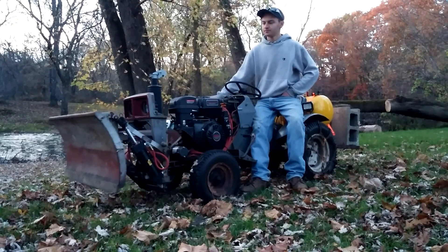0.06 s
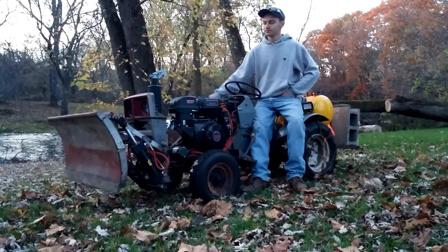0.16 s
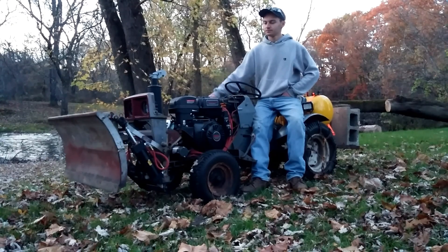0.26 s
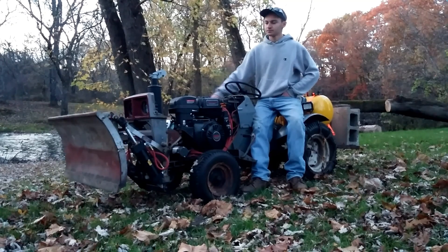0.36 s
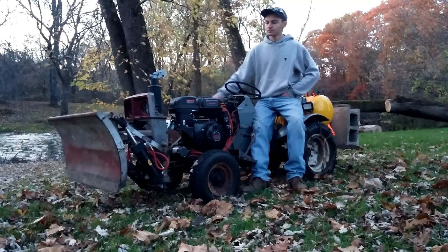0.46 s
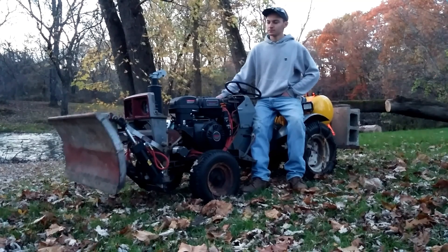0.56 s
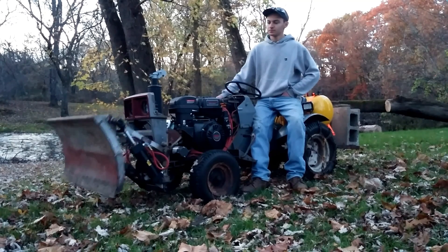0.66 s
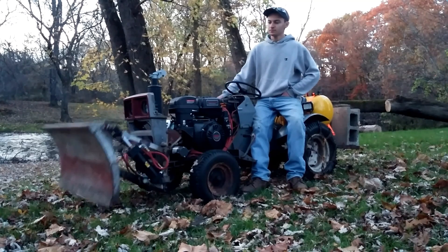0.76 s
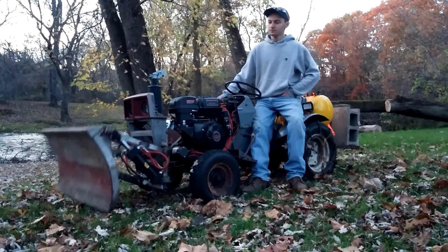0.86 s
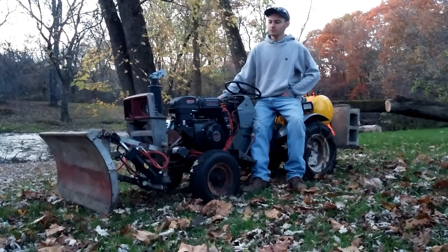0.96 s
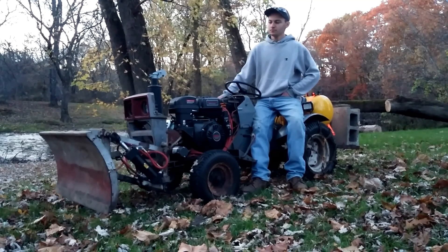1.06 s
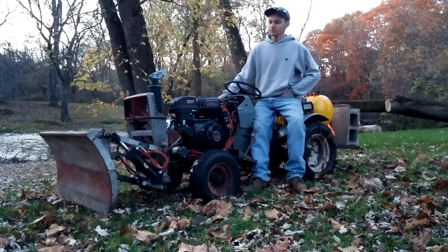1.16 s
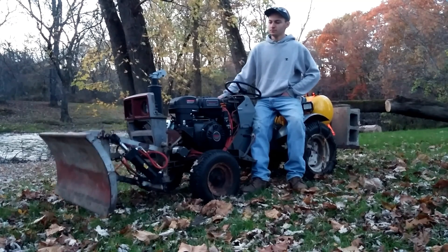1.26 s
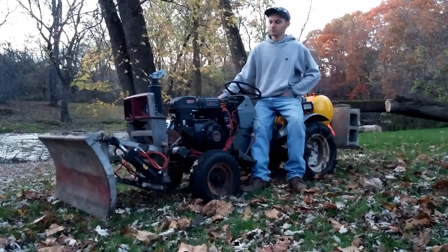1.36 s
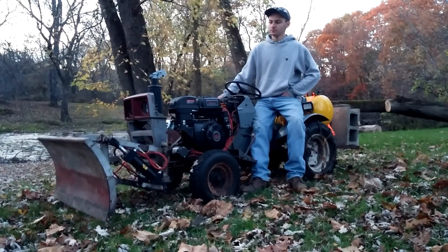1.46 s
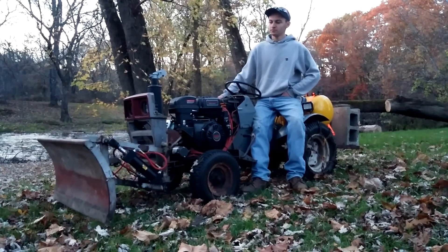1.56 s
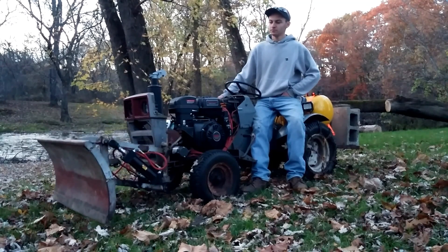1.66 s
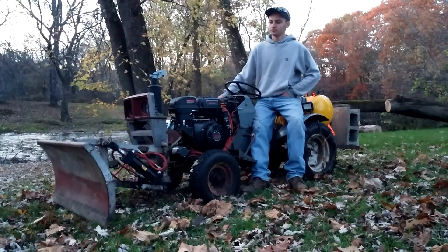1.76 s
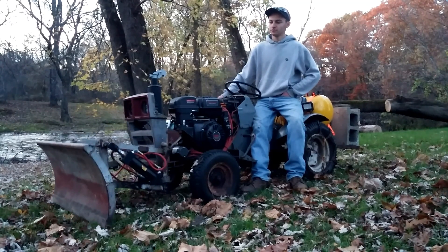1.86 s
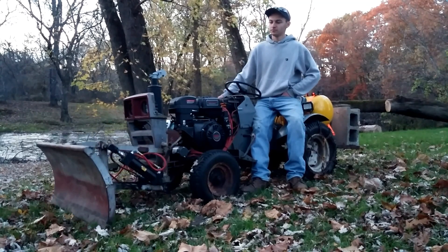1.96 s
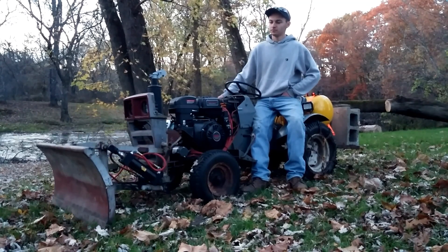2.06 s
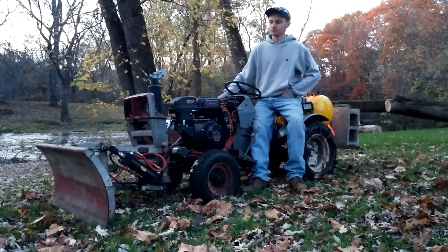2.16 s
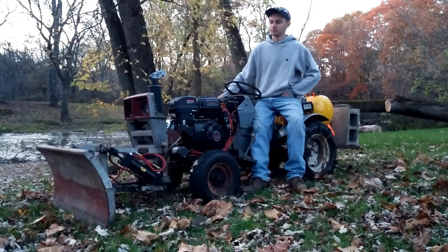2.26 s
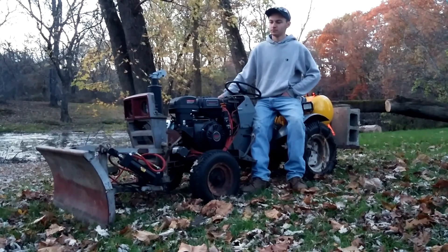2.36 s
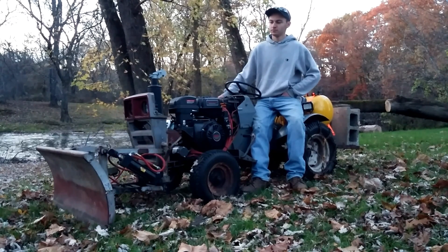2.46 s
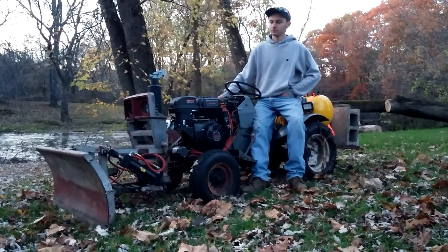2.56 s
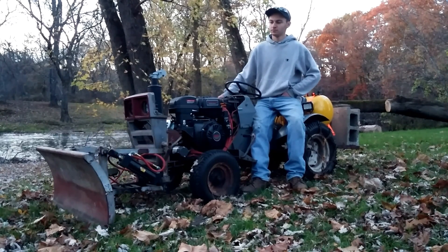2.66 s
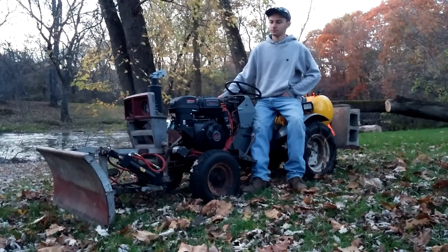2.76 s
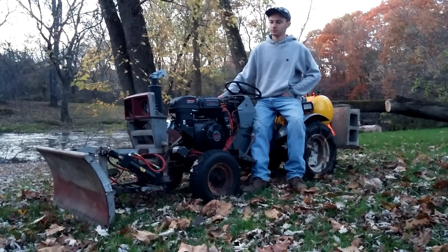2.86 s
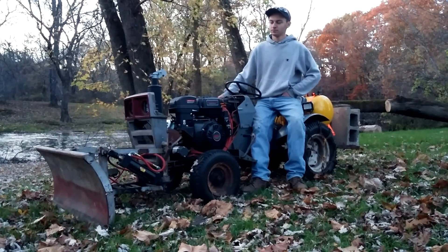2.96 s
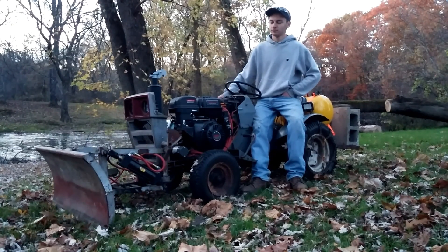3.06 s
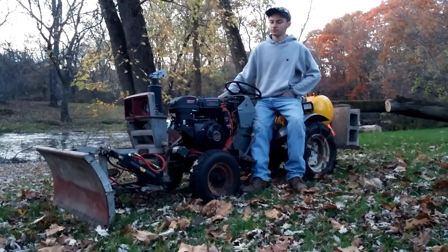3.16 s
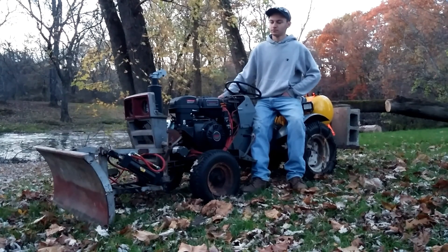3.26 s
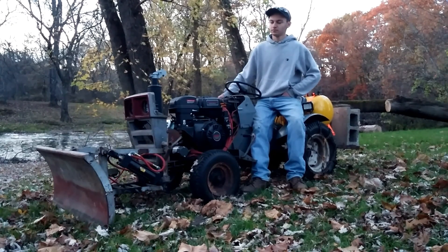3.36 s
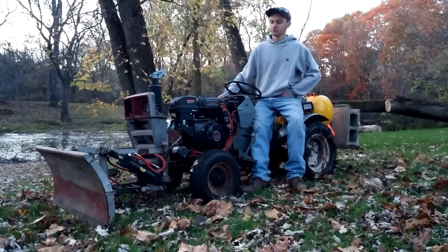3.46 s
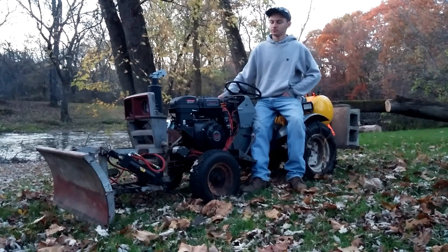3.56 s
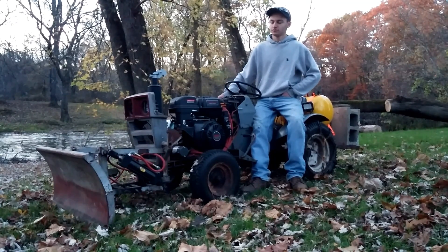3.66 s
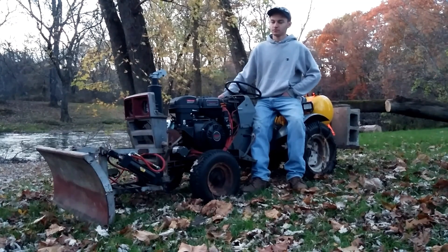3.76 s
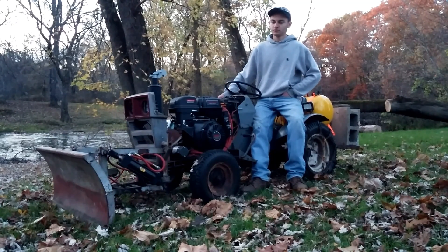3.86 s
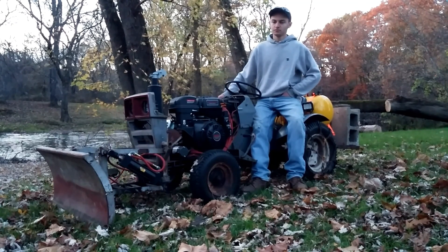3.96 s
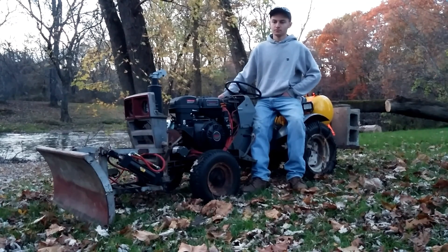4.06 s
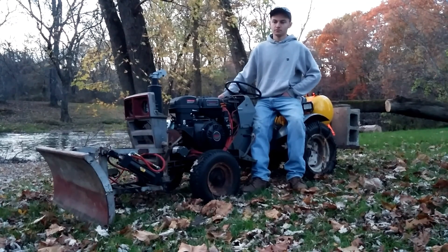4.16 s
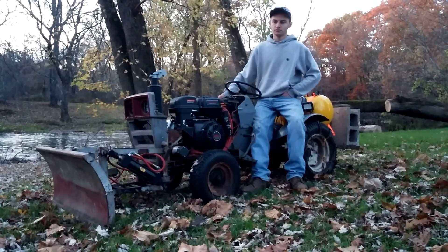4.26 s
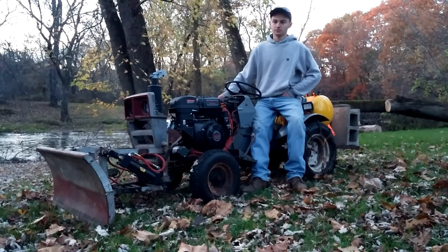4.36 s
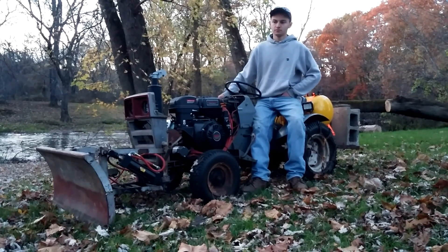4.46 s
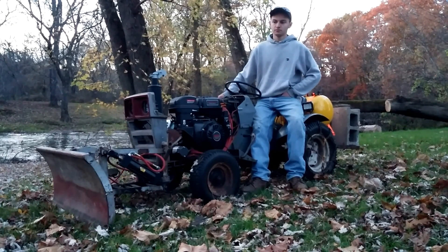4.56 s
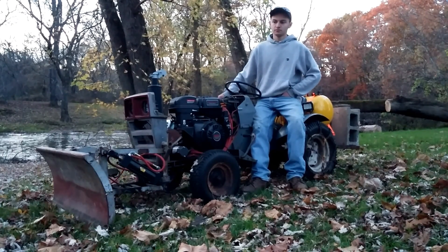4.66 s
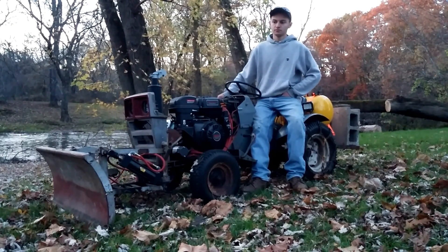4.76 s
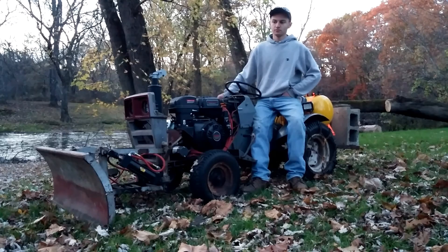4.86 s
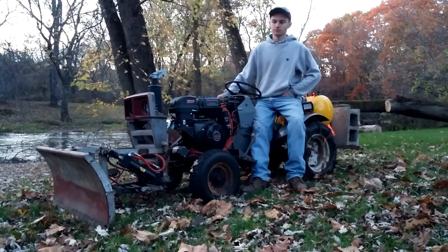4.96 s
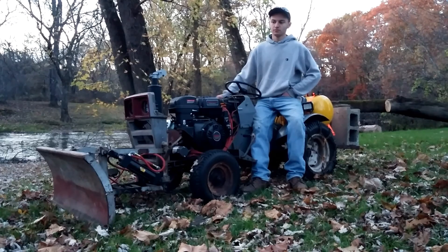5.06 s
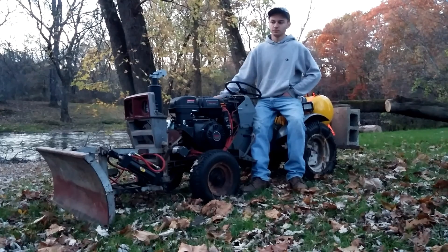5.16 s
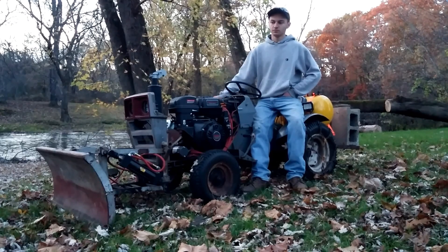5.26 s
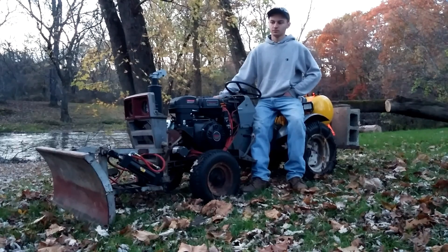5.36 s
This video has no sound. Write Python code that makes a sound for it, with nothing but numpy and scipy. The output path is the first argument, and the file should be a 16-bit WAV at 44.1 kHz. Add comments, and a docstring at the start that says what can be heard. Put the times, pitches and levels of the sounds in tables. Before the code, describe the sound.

Outdoors at a wood's edge, heard fairly close and centred. A bright, strong air hiss is already running and cuts off around 0.14 s, as a lift arm clangs hard at 0.17 s, with smaller clacks and another sharp clank near 0.35 s. At about 0.7 s a second port opens with a thin, whistly high hiss and some roar; duller linkage knocks follow at 0.83 and 0.9 s. The steel blade lands with a ringing clank at 1.7 s, hits again near 2.04 s, then bounces in quick, weakening, duller knocks until about 2.6 s. The hiss holds until 2.9 s, then loses its roar and fades away by around 5 s. Faint distant traffic and dry leaf rustle slowly grow, with soft low bumps near 3.0, 3.9 and 4.9-5.1 s. At 5.35 s a louder, bright air blast begins abruptly. Soft echoes return from the trees.

```python
"""Air-driven blade of a parked garden tractor

At the edge of a wood, one valve port hisses until the lift arm clanks against its stop. The other then vents
the cylinder while the steel blade drops, lands and bounces, and fades as the pressure runs out; the first port
opens again. Jets are coloured noise, knocks are decaying modes and noise bands, trees are sparse-free noise echoes.
Far traffic and dry leaves, made of wavering noise, grow behind them, with a few soft low bumps.
"""
import sys
import numpy as np
from scipy import signal
from scipy.fft import rfft, irfft, next_fast_len
from scipy.io import wavfile
from scipy.ndimage import uniform_filter1d

SR = 44100
rng = np.random.default_rng(int(sys.argv[2]) if len(sys.argv) > 2 else 0)


def waveform_to_disk(signal):
    """Save audio, clipped to [-1, 1], as 16-bit WAV at the path in sys.argv[1]."""
    frames = np.transpose(np.atleast_2d(signal))
    scaled = np.clip(frames, -1, 1) * 32767
    samples = np.round(scaled).astype(np.int16)
    wavfile.write(sys.argv[1], SR, samples)


N = 238845
TIME = np.arange(N) / SR  # s
AGE = TIME[:SR * 2 // 5]  # time since a knock, s

# modes of the tractor frame, shaken by arm and blade alike: (frequency [Hz], relative level [dB])
FRAME_MODES = [(110, -20), (195, -17), (232, -5), (262, -8), (323, -2), (355, -7), (393, 2), (415, -3),
               (478, -13), (570, -20)]
FRAME_T60 = 0.17  # ring time of the frame, scaled to 1 kHz, s
SCATTER_DB = 1.2  # random spread of mode levels from blow to blow


def from_db(db):
    """Decibels to gain."""
    return 10 ** (np.asarray(db) / 20)


def rms_one(x):
    """Scale to unit power."""
    return x / np.sqrt(np.mean(x ** 2) + 1e-20)


def at_hz(rows, hz, axis=1):
    """One column of a spectrum, read on a log-frequency axis."""
    rows = np.array(rows)
    return np.interp(np.log(hz + 1), np.log(rows[:, 0]), rows[:, axis])


def noise(gain_at, size=N):
    """Unit-power noise whose colour is a function of frequency."""
    padded = next_fast_len(size, True)
    hz = np.arange(padded // 2 + 1) * SR / padded
    spectrum = rfft(rng.standard_normal(padded)) * gain_at(hz)
    return rms_one(irfft(spectrum, padded)[:size])


def coloured(spectrum, resonances=()):
    """Unit-power noise with a broad spectrum and narrow resonances standing on it."""
    def gain_at(hz):
        power = from_db(at_hz(spectrum, hz)) ** 2
        for centre, width, db in resonances:
            power = power + from_db(db) ** 2 / (1 + (2 * (hz - centre) / width) ** 2) ** 2
        return np.sqrt(power)
    return noise(gain_at)


def flutter(rate_hz, depth_db):
    """A gain that wanders at random, mostly slower than the given rate; the depth is RMS."""
    return from_db(depth_db * noise(lambda hz: 1 / (1 + (hz / rate_hz) ** 4)))


def low_pass(x, hz, order=2):
    """Causal Butterworth low-pass."""
    return signal.sosfilt(signal.butter(order, min(hz, SR / 2 - 100), fs=SR, output="sos"), x)


def ring(modes, t60_at_khz):
    """Struck modes of unit starting power; high ones die sooner, and each blow shares its energy anew."""
    hz, db = np.array(modes).T[:, :, None]
    t60 = t60_at_khz * (hz / 1000) ** -.4
    gain = from_db(db + SCATTER_DB * rng.standard_normal(db.shape))
    phase = 2 * np.pi * (hz * AGE + rng.random(hz.shape))
    waves = np.sin(phase) * from_db(-60 * AGE / t60)
    return np.sum(gain * waves, axis=0) / np.sqrt(np.sum(gain ** 2) / 2)


def crowd(table, count=18):
    """Modes too dense to tell apart: noise bands, each dying at its own rate; unit starting power."""
    edges = np.geomspace(150, 16000, count + 1)  # Hz
    centres = np.sqrt(edges[1:] * edges[:-1])
    gains = from_db(at_hz(table, centres)) * np.sqrt(np.diff(edges))
    t60s = at_hz(table, centres, axis=2)
    out = 0
    for low, high, gain, t60 in zip(edges, edges[1:], gains, t60s):
        band = noise(lambda hz: (hz >= low) & (hz < high), size=len(AGE))
        out = out + gain * band * from_db(-60 * AGE / t60)
    return out / np.sqrt(np.sum(gains ** 2))


def ping(centre_hz, width_hz, t60):
    """A short cluster of close modes around one pitch; about unit starting power."""
    cluster = noise(lambda hz: 1 / (1 + (2 * (hz - centre_hz) / width_hz) ** 2), size=len(AGE))
    envelope = np.sqrt(uniform_filter1d(cluster ** 2, size=SR // 50) + 1e-12)
    return cluster / envelope * from_db(-60 * AGE / t60)


def build_up(seconds):
    """Onset gain: vibration takes a moment to spread through the loose steel."""
    return 1 - np.exp(-AGE / seconds)


def add(track, s, sound):
    """Lay a sound into a track at a given time."""
    start = round(s * SR)
    track[start:start + len(sound)] += sound[:N - start]


def swell():
    """Nearness of a distant vehicle, 0 to 1; it draws near until the end."""
    peak_s, width_s = 5.62, 1.47
    return 1 / (1 + ((TIME - peak_s) / width_s) ** 4)


def traffic():
    """Lumpy rumble and tyre wash of a far road; moving air makes the wash waver band by band."""
    # spectrum of the rumble: (frequency [Hz], relative density [dB per Hz])
    rumble_spectrum = [(20, -40), (38, -63), (58, 1.5), (85, 5.5), (125, 4), (170, -9), (300, -47)]
    # spectrum of the wash; soft ground cancels the band near 700 Hz: (frequency [Hz], relative density [dB per Hz])
    tyre_spectrum = [(100, -2.5), (170, 0), (220, 3.5), (300, 4), (400, 4), (510, 1), (600, -13),
                     (720, -15), (810, -9), (900, -0.5), (1300, -8), (2000, -11), (2800, -10),
                     (3500, -20.5), (6000, -28), (11000, -40.5), (16000, -53)]
    rumble_db, tyres_db = -53, -47  # level with the vehicle far off
    rumble_swell_db, tyres_swell_db = 5, 5  # how far its approach lifts them

    rumble = coloured(rumble_spectrum) * flutter(rate_hz=16, depth_db=2.5)
    rest, wash = coloured(tyre_spectrum), 0
    for edge_hz in 300 * 2 ** np.arange(5):
        band = signal.sosfiltfilt(signal.butter(4, edge_hz, fs=SR, output="sos"), rest)
        wash = wash + band * flutter(rate_hz=21.6, depth_db=2.0)
        rest = rest - band
    near = swell()
    rumble = from_db(rumble_db + rumble_swell_db * near) * rumble
    return rumble + from_db(tyres_db + tyres_swell_db * near) * (wash + rest)


def leaves(level_db=-62.0, swell_db=5):
    """Short, uneven rustles of dry leaves: fluttering mid-band noise that grows with the background."""
    rustle = noise(lambda hz: 1 / (1 + ((hz - 1500) / 500) ** 4))
    rustle = rms_one(rustle * flutter(rate_hz=28, depth_db=4.5))
    return from_db(level_db + swell_db * swell()) * rustle


def bumps():
    """Soft low bumps in the background: short clusters of close, decaying modes."""
    # when and how they sound: (time [s], pitch [Hz], level before the onset [dB])
    soft_bumps = [(3.036, 295, -38.5), (3.89, 296, -38), (4.859, 236, -34.5), (4.901, 182.8, -35.5),
                  (5.061, 407, -37.5)]
    out = np.zeros(N)
    for s, hz, db in soft_bumps:
        add(out, s, from_db(db) * ping(hz, width_hz=64, t60=0.18) * build_up(0.0033))
    return out


def valve_flow(opens, closes=np.inf):
    """Share of full flow through a port: quick attack, hold, quick release."""
    open_s, shut_s = 0.0093, 0.011  # time constants of the valve spool
    opening = 1 - np.exp(-np.maximum(TIME - opens, 0) / open_s)
    return opening * np.exp(-np.maximum(TIME - closes, 0) / shut_s)


def valves():
    """Turbulent jets of two ports; as pressure falls the low roar dies sooner than the hiss."""
    # strokes of the port that raises the blade: (opens [s], closes [s], level [dB])
    raise_strokes = [(-0.1, 0.139, -29), (5.349, 5.6, -23.2)]
    # jet noise of the raising port: (frequency [Hz], relative density [dB per Hz])
    raise_jet = [(1000, -24), (3000, -12), (3600, -5), (4400, 3.5), (5300, 0.5), (6200, 6), (8300, 6.5),
                 (9600, 3), (11700, 0.5), (13000, -1), (15500, 1.5)]
    # jet noise of the lowering port: (frequency [Hz], relative density [dB per Hz])
    lower_jet = [(1000, -34), (3400, -18.5), (4600, -18), (5600, -13.5), (6500, -7), (7500, -2.5),
                 (8300, -1), (8900, -4), (9600, -9), (12200, -11.5), (12900, -10), (13500, -11.5),
                 (15500, -8.5)]
    # resonances of the lowering valve's passages: (frequency [Hz], width [Hz], level [dB])
    passages = [ (5125, 90, -5), (5405, 80, -5), (5890, 80, -.5), (6110, 70, -1), (6300, 80, -.5),
                (6860, 85, 3), (7420, 75, 0), (7750, 80, 0), (8040, 80, .5), (8290, 90, 3),
                (8400, 110, 6.5), (8630, 130, 2.5), (9250, 75, -2), (9510, 70, -7), (10020, 70, -6),
                (10300, 170, -6), (10860, 140, -7), (11400, 220, -4.5), (11780, 90, -6), (11980, 80, -6),
                (12300, 190, -6), (13300, 120, -5.5), (13600, 120, -5.5), (14000, 200, -5),
                (14670, 220, -4.5), (15200, 270, -4)]
    # roar that the lowering jet adds mainly at high pressure: (frequency [Hz], relative density [dB per Hz])
    jet_roar = [(1000, -15.5), (2200, -14), (2700, -2.5), (3100, -28), (3900, -3.5), (4400, 5), (5100, 5.5),
                (6500, 5), (9000, -28), (15000, -21)]
    lower_opens_s, lower_db = 0.695, -29.5  # this port stays open
    travel_ends_s, drain_s = 2.905, 2.12
    hiss_exponent, roar_growth = 2.44, 1.6  # powers of pressure for the jet, of the flow for the roar
    roar_db = -38.0
    leak_db, leak_dull_hz = -55.5, 10000  # level at full pressure, before the dulling filter

    # the piston keeps the pressure up to the end of its travel; then it drains evenly to nothing
    pressure = np.clip(1 - (TIME - travel_ends_s) / drain_s, 0, 1)
    drive = pressure ** hiss_exponent
    raise_flow = sum(from_db(db) * valve_flow(opens, closes) for opens, closes, db in raise_strokes)
    lower_flow = drive * valve_flow(lower_opens_s)
    jet = coloured(raise_jet)
    # air seeps past the raising port, duller than its open jet
    leak = from_db(leak_db) * drive * low_pass(jet, leak_dull_hz, order=1)
    lowering = from_db(lower_db) * lower_flow * coloured(lower_jet, passages)
    roar = from_db(roar_db) * lower_flow ** roar_growth * coloured(jet_roar)
    roar = roar * flutter(rate_hz=2.8, depth_db=1.2)
    return (raise_flow * jet + leak + lowering + roar) * flutter(rate_hz=52, depth_db=0.57)


def lift_arm():
    """The arm clangs and shakes the frame; each point of contact adds a short ping of its own."""
    # knocks, levels before the onset and the clang's filter: (time [s], clang [dB], thump [dB], ping pitch [Hz])
    arm_knocks = [(0.1652, -14, -18.5, 7030), (0.174, -15.5, -18, 4030), (0.218, -34, -23, 4000),
                  (0.262, -35, -33, 330), (0.318, -25.5, -31.5, 2420), (0.348, -15, -25, 5250),
                  (0.35, -26.5, -34, 7850), (0.355, -23.5, -39, 2140), (0.576, -35.5, -59, 4500),
                  (0.691, -43, -48, 1305), (0.83, -36.5, -38, 402), (0.897, -26, -32.5, 1246),
                  (0.904, -23, -29.5, 1410)]
    # distinct modes of the arm: (frequency [Hz], relative level [dB])
    arm_modes = [ (845, -11), (942, -7), (1023, -4), (1065, -4), (1125, -5), (1319, -8), (1430, -4),
                 (1585, -1), (1630, -1), (1798, -4), (2003, -5), (2180, -3), (2240, -3), (2320, -6),
                 (2484, -2), (2760, -3), (3990, -3), (4740, -8), (5140, -4), (5510, -6), (6870, -3),
                 (6990, 0), (7210, -1), (7330, -1)]
    # weaker modes between them: (frequency [Hz], relative density [dB per Hz], t60 [s])
    arm_crowd = [(250, -1, 0.48), (446, -3, 0.87), (624, -20, 0.24), (800, -11, 0.54), (940, 0, 0.27),
                 (2340, 4, 0.19), (3240, 1, 0.13), (5200, 0.5, 0.11), (6300, -4, 0.076), (7500, 8, 0.053),
                 (9400, -23, 0.047), (15000, -25, .05)]
    arm_t60, ping_t60 = .17, 0.16  # s at 1 kHz; higher notes die sooner
    modes_db, crowd_db, ping_db = -3, -4.0, 0  # the ping is relative to the clang
    ping_spread = 0.14  # width as a share of the pitch
    dullest_hz, bright_per_ping = 1660, 0.95  # a harder contact pings higher and opens up the clang

    out = np.zeros(N)
    for s, clang_db, thump_db, ping_hz in arm_knocks:
        steel = from_db(modes_db) * ring(arm_modes, arm_t60)
        steel = steel + from_db(crowd_db) * crowd(arm_crowd)
        clang = from_db(clang_db) * low_pass(steel, dullest_hz + bright_per_ping * ping_hz, order=4)
        thump = from_db(thump_db) * ring(FRAME_MODES, FRAME_T60)
        contact = ping(ping_hz, ping_spread * ping_hz, ping_t60 * np.sqrt(1000 / ping_hz))
        contact = from_db(clang_db + ping_db) * contact
        add(out, s, (clang + thump + contact) * build_up(0.0019))
    return out


def blade():
    """The plate rings at every bounce, duller for softer blows; its edge clanks, the frame shakes."""
    # landing and bounces: (time [s], strength [dB])
    blade_knocks = [(1.714, -13.5), (1.921, -26.5), (2.0442, -15.5), (2.127, -18.5), (2.21, -20),
                    (2.295, -21), (2.366, -26), (2.423, -30), (2.48, -31.5), (2.545, -31.5), (2.62, -39)]
    # distinct modes of the plate: (frequency [Hz], relative level [dB])
    blade_modes = [ (237, -18), (323, -13), (393, -6), (500, -10), (627, -10), (797, -1), (845, -8),
                   (915, -9), (1023, -9), (1199, -1), (1357, -9), (1436, -8), (1593, -10), (1818, -2),
                   (2058, -3), (2465, -7), (2780, -2), (3630, -10)]
    # weaker modes between them: (frequency [Hz], relative density [dB per Hz], t60 [s])
    blade_crowd = [(130, -23, 0.21), (360, 2.5, 0.74), (670, 0, 0.33), (1140, 3, 0.31), (1700, 4.5, 0.17),
                   (2910, -0.5, 0.27), (3200, -10, .08), (3760, 4, 0.19), (6140, -26, .05)]
    plate_t60, edge_t60 = .16, .15  # s; the plate's is at 1 kHz
    modes_db, crowd_db = -1.5, -5.5
    edge_db, thump_db = -4.5, -17.5  # relative to the blow
    dullest_hz, hardening_hz = 790, 9600  # cutoff of the softest touch, and what a 0 dB blow adds

    out = np.zeros(N)
    for s, db in blade_knocks:
        steel = from_db(modes_db) * ring(blade_modes, plate_t60)
        steel = steel + from_db(crowd_db) * crowd(blade_crowd)
        plate = low_pass(steel, dullest_hz + hardening_hz * from_db(db), order=3)
        edge = from_db(edge_db) * ping(1210, width_hz=110, t60=edge_t60)
        thump = from_db(thump_db) * ring(FRAME_MODES, FRAME_T60)
        onset = build_up(0.0029) ** 2  # turf cushions the first touch
        add(out, s, from_db(db) * (plate + edge + thump) * onset)
    return out


def scatter(x, wet_db, t60, dull_hz):
    """Countless weak echoes: convolution with decaying noise that has lost treble."""
    t = TIME[:2 * SR]
    echoes = rng.standard_normal(len(t)) * from_db(-60 * t / t60) * (1 - np.exp(-t / 0.023))
    echoes = low_pass(echoes / np.sqrt(np.sum(echoes ** 2)), dull_hz, order=1)
    return from_db(wet_db) * signal.fftconvolve(x, echoes)[:N]


def scene(knock_echo_db=-4):
    """Background, valves and knocks, with echoes from the trees; one microphone feeds both channels."""
    background = traffic() + leaves() + bumps()
    hiss = valves()
    knocks = lift_arm() + blade()
    # of the knocks, mostly the lower notes come back from the trees
    radiated = hiss + from_db(knock_echo_db) * low_pass(knocks, 4300)
    near_trunks = scatter(radiated, wet_db=-17.5, t60=0.5, dull_hz=12100)
    far_wood = scatter(radiated, wet_db=-15.0, t60=1.0, dull_hz=5000)
    return np.tile(hiss + knocks + near_trunks + far_wood + background, (2, 1))


def record(dry, ceiling=1.0):
    """The microphone sheds the deepest bass, the loudest peaks are rounded and the top is cut."""
    thinned = signal.sosfilt(signal.butter(4, 42, "high", fs=SR, output="sos"), dry)
    rounded = ceiling * np.tanh(thinned / ceiling)
    top_cut = signal.ellip(12, .1, 80, 15500, fs=SR, output="sos")  # steep, at 15.5 kHz
    return signal.sosfilt(top_cut, rounded)


dry = scene()
out = record(dry)
waveform_to_disk(out)
```